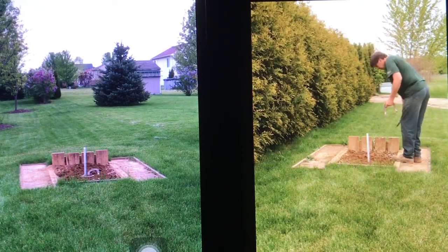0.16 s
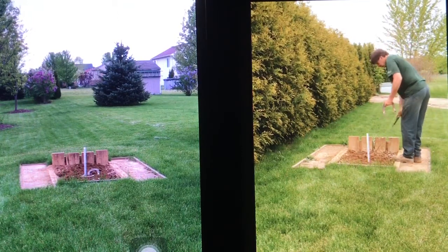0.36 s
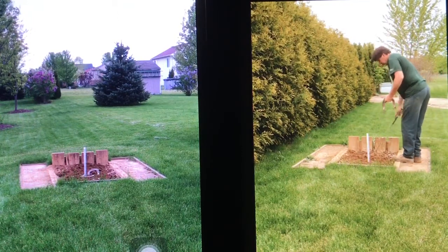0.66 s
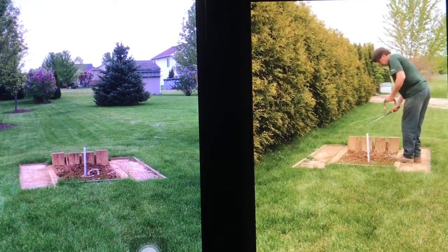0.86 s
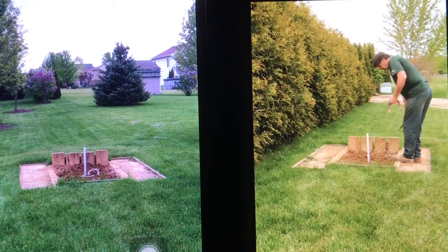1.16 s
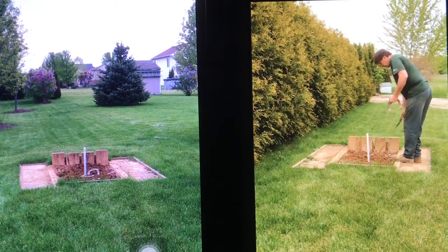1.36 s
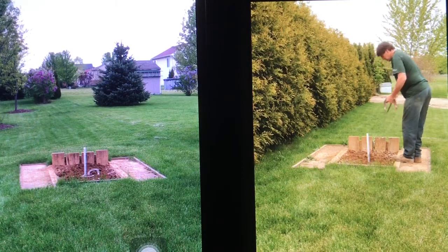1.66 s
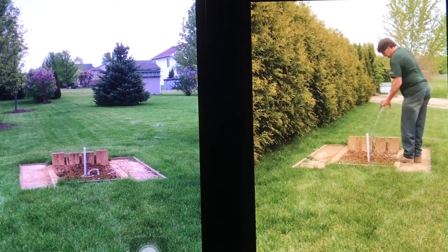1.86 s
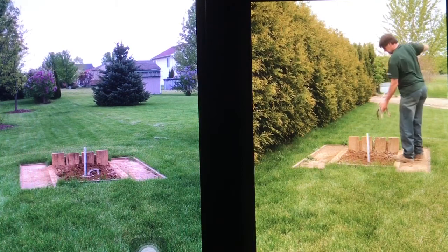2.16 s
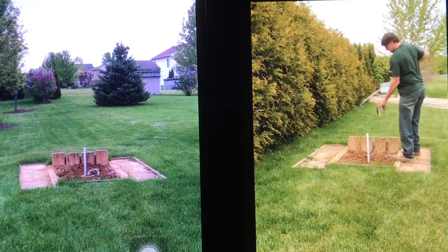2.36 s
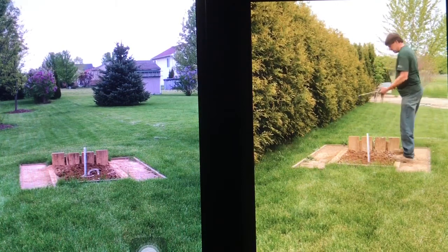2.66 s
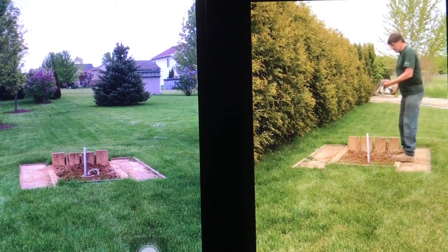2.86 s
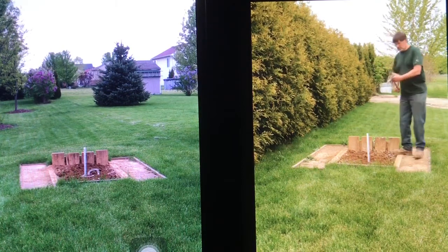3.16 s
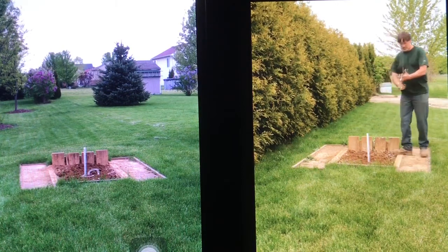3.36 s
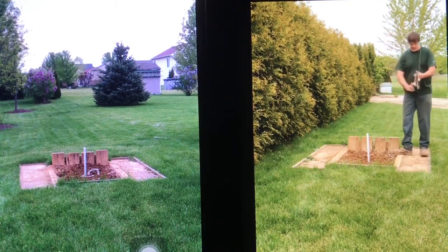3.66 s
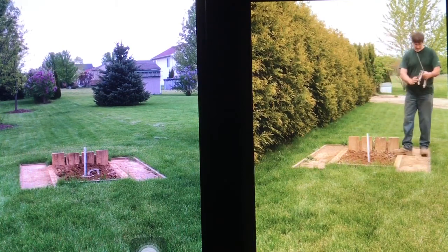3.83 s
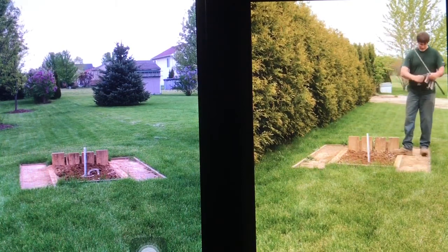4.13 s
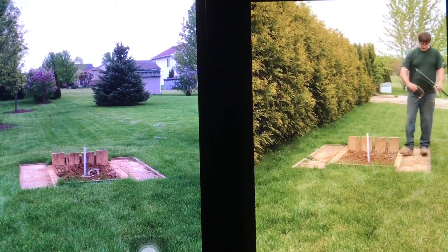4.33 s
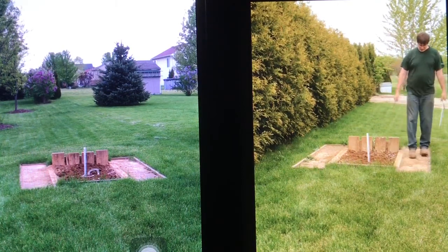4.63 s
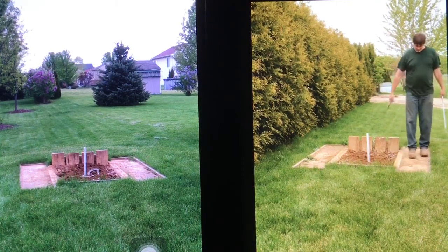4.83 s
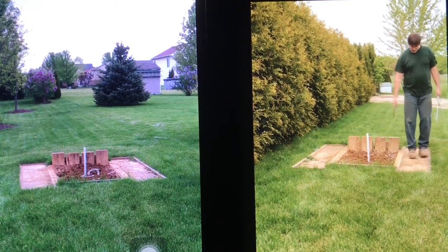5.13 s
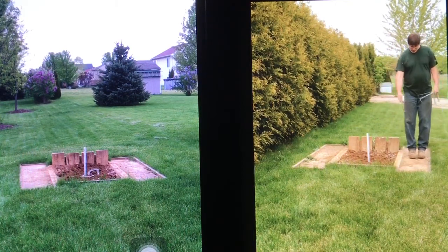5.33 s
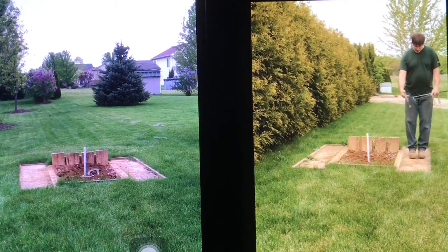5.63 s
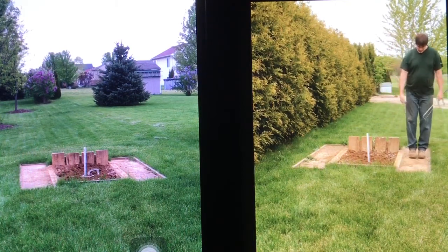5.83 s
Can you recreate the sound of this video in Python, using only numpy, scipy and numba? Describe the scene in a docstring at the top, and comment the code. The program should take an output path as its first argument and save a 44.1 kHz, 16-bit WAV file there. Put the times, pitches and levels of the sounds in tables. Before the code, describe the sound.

A back yard heard by one microphone at some distance. At 0.05 seconds a very loud, hard steel clank cracks out, choked with almost no ring, and slaps back from nearby walls with a diffuse hedge tail. Soft scuffing leads to a second, brighter, rattling double clank near 1.2 seconds. From 1.7 seconds horseshoes clink in the hands: a few short muted ticks, then the loudest clear ring at 2.2, shimmering for about half a second with a noisy wash. More mid-high clinks cluster at 2.55-2.65, faint ones follow at 3.25, and a bright short pair with dull ticks comes around 3.6. A last faint ring sounds at 4.1. Low boot thumps appear throughout, strongest at 4.5, with weak ones after 5.2. A small bird repeats a falling three-note chirp roughly every 0.7 seconds from 1.15 onward, over faint air, leaves and distant hum.

```python
"""Horseshoes in a back yard.

Two hard, choked clanks (resonant noise bursts), then freely ringing clinks and some wall echoes of them
(ticks plus decaying modes). Nearby walls return a cluster of echoes and hedges a diffuse tail.
A bird repeats one chirp of gliding sines; filtered noise makes footfalls, scuffs and a wash of reflections.
Shaped noise makes outdoor air and leaves; wavering sines make the hum of a far machine."""
import sys
import numpy as np
from scipy import signal
from scipy.fft import rfft, irfft
from scipy.io import wavfile
from scipy.ndimage import uniform_filter1d
from numba import njit

SR = 44100
rng = np.random.default_rng(int(sys.argv[2]) if len(sys.argv) > 2 else 0)


def store_wav(level_fs):
    """Save 16-bit WAV to argv[1]."""
    pcm = np.round(np.clip(np.atleast_2d(level_fs), -1, 1) * 32767)
    wavfile.write(sys.argv[1], SR, pcm.T.astype(np.int16))


N = 264159
T = np.arange(N) / SR

# choked clanks: (time [s], relative blow level [dB], centre [Hz], width [Hz],
#   brightness [dB], ring level [dB], yard level [dB])
CLANK_BLOWS = [(0.0551, -3.5, 2590, 1440, -10.5, -37.5, 2.5), (1.177, -34, 2700, 2500, 4, -53, 1),
               (1.1865, -8, 3530, 1510, -8, -43, -3.5), (1.2063, -13.5, 5470, 2500, -5.5, -49, -16)]
# spectrum of steel-on-steel contact: (frequency [Hz], gain [dB])
CONTACT_SPECTRUM = [(200, -28.5), (900, -18.5), (1600, -6), (2500, 3.5), (4000, 2.5), (5500, -6),
                    (7500, -7.5), (9500, -17), (13000, -32), (16000, -34)]
# ringing clinks, and some wall echoes of them, played as further clinks:
#   (time [s], ring level [dB], favoured frequency [Hz],
#   tilt [dB/octave], ring length [share of t60], relative contact level [dB])
CLINK_EVENTS = [(1.7160, -32.5, 2180, 4.5, .4, -10), (1.7650, -38.5, 3400, -5, 0.13, -12),
                (1.8179, -46, 3400, -19, 0.19, -21.5), (2.1480, -57, 9300, 4.5, 2, -35),
                (2.1862, -20.5, 3450, -8, 0.89, 2.5), (2.1880, -21.5, 4700, 1, 1.14, -17),
                (2.2225, -24.5, 2120, 6.5, 0.75, -14), (2.3450, -30.5, 3620, 0, 0.75, -36),
                (2.5622, -29, 3440, 2, 0.25, -29.5), (2.6110, -31.5, 3420, 1.5, 0.64, -17),
                (2.6290, -33.5, 1300, -3, 0.47, -5), (2.6570, -40, 2500, -5.5, 1.52, -34),
                (3.2420, -46, 1760, -8, 0.38, -34), (3.2770, -52.5, 1540, -10.5, 0.97, -22),
                (3.5625, -36.5, 1450, -6, 0.26, -11.5), (3.6125, -37.5, 1430, -8.5, 0.17, -16.5),
                (3.6477, -18.5, 5600, -3.5, 0.2, -16.5), (3.6600, -30.5, 2450, 7.5, 0.52, -3),
                (4.1360, -48.5, 1950, -7.5, 1.65, -30)]
# modes of the two shoes: (frequency [Hz], relative level [dB], t60 at ring length 1 [s])
SHOE_MODES = [(1254, -19.5, .9), (1406, -23, .7), (1902, -20, .55), (2169, 0, .55), (2266, -13, .45),
              (2300, -3, .75), (3235, -22, .45), (3290, -19, .45), (3441, -15, .45), (3459, 0, .55),
              (4825, -12, .35), (4852, -3, .42), (5017, -17, .45), (5798, -30, .3), (6733, -14, .4),
              (6757, -14, .45), (6952, -17, .4), (7041, -19, .35), (8785, -29, .35), (9052, -22, .35),
              (9625, -32, .3), (11300, -28, .3), (11700, -22, .28), (14030, -34, .28)]
# echoes from fence and far houses: (delay [s], relative level [dB])
YARD_ECHOES = [(.0286, 5.5), (.0375, 0), (.0775, 3.5), (.0868, -1), (.1050, -31), (.1235, -8.5),
               (.2410, -14.5), (.2900, -13.5), (.775, -18.5)]
# colour of the reflections: (frequency [Hz], gain [dB])
YARD_SPECTRUM = [(200, -13), (1600, -12), (2700, -1), (4000, -2), (5500, -7), (8000, -15.5), (12000, -16.5),
                 (16000, -12)]
# scuffs, and the noisy wash of reflections after the loud clink:
#   (middle [s], half length [s], level [dB rms at the middle], centre [Hz], width [Hz])
SCUFFS_AND_WASH = [(1.101, 0.15, -44.5, 3740, 500), (1.113, 0.18, -50, 1330, 450),
                   (1.28, .035, -27.5, 2820, 347), (2.33, 0.11, -31.5, 2870, 800),
                   (2.65, 0.025, -47, 12200, 4870), (3.311, 0.094, -42.5, 2320, 1390)]
# footfalls: (time [s], level [dB peak])
FOOTFALLS = [(.126, -37.5), (1.953, -37), (2.569, -42), (2.637, -41.5), (2.754, -36.5), (2.8, -44),
             (3.131, -44.5), (4.492, -29), (4.502, -32.5), (4.593, -42.5), (5.222, -44), (5.34, -43)]
# chirps: (time [s], relative level [dB])
CHIRP_TIMES = [(1.151, -39), (1.944, -38.5), (2.747, -42), (3.463, -39), (4.126, -39.5), (4.824, -38.5),
               (5.537, -36.5)]
# arched notes of a chirp: (delay [s], length [s], first [Hz], middle [Hz], last [Hz], relative level [dB])
CHIRP_NOTES = [(.004, 0.049, 3950, 4686, 2764, -5), (0.075, 0.043, 3060, 3758, 2895, -1.5),
               (0.131, .03, 2850, 2950, 2750, -4.5)]
# distant machine: (frequency [Hz], mean level [dB rms])
HUM_TONES = [(120, -67.5), (589, -57), (1191, -63)]
# spectrum of outdoor air: (frequency [Hz], relative density [dB])
AIR_SPECTRUM = [(20, -40), (58, -9.5), (95, -17), (160, -27.5), (250, -16), (430, -18.5), (680, -9.5),
                (950, -12.5), (1900, -13.5), (2900, -7), (3900, -11.5), (5400, -23.5), (8700, -36.5),
                (15500, -37)]
# ripple of the microphone's housing: (frequency [Hz], gain [dB])
MIC_RIPPLE = [(4200, 0.5), (4700, 1), (5350, -5.5), (5850, 4), (6300, -4.5), (6900, 6), (7300, -3.5),
              (7800, 2), (8500, -2.5), (10000, 0)]

SIZZLE_GAIN_DB, SIZZLE_DECAY_S, SIZZLE_HZ = 6, 0.025, 10100  # gain relative to the blow level
TICK_HZ, TICK_WIDTH_HZ, TICK_DECAY_S = 2420, 940, 0.0051
FAVOUR_DB, FAVOUR_OCTAVES = 14.5, 0.3  # lift of modes near the favoured frequency, and its reach
GRIP_CENTS = 2.32  # sharpening by a grip that halves the ring
WANDER_DB, WANDER_CENTS = 3, 4.5  # spread of each mode's level and pitch
SMEAR_S, SMEAR_DOUBLES_S = 0.0016, 0.45  # echo smear, and the delay that doubles it
WALL_DELAY_S, WALL_BOUNCE_DB = 0.049, -9
TAIL_BUILD_S, TAIL_T60_S = 0.038, 0.61
TREES_DB, TREES_HOLD_S, TREES_T60_S = -39, 0.82, 0.31  # level relative to the hedge
STEP_HZ, STEP_DECAY_S = 297, 0.012
AIR_DB, LEAVES_DB = -46, -56.5  # mean rms
LEAVES_HZ, LEAVES_WIDTH_HZ = 3300, 700
THRESHOLD_DB, RELEASE_S = -12.5, 0.14
TOP_HZ = 15700


def undb(db):
    """Decibels to gain."""
    return 10 ** (np.asarray(db) / 20)


def unit(x):
    """Scale to an rms of one."""
    return x / np.sqrt(np.mean(x ** 2))


def add(out, start_s, x):
    """Mix x into out from start_s."""
    i = max(int(start_s * SR), 0)
    out[i:i + len(x)] += x[:N - i]


def colour(x, points):
    """Minimum-phase filter with the given (Hz, dB) outline."""
    size = 4096
    hz, db = np.transpose(points)
    log_hz = np.log(np.fft.rfftfreq(size, 1 / SR) + 1)
    gain = undb(np.interp(log_hz, np.log(hz), db))
    # folding the cepstrum makes the response causal
    cepstrum = irfft(np.log(gain))
    cepstrum[1:size // 2] *= 2
    cepstrum[size // 2 + 1:] = 0
    response = irfft(np.exp(rfft(cepstrum)))
    return signal.fftconvolve(x, response)[:len(x)]


def resonate(x, hz, width_hz):
    """One resonance, gain one at its centre."""
    return signal.lfilter(*signal.iirpeak(hz, hz / width_hz, fs=SR), x)


def resonate_twice(x, hz, width_hz):
    """Two resonances in series at one centre, the second twice as wide."""
    return resonate(resonate(x, hz, width_hz), hz, 2 * width_hz)


def lowpass(x, order, hz):
    """Butterworth low-pass."""
    return signal.sosfilt(signal.butter(order, hz, fs=SR, output="sos"), x)


def burst(decay_s):
    """Unit-energy puff of noise: faded, spectrally flattened, then faded again by the root of the fade."""
    t = T[:SR // 10]
    fade = np.exp(-t / decay_s) * (1 - np.exp(-t / 0.00054))
    spectrum = rfft(rng.standard_normal(len(t)) * fade)
    x = irfft(spectrum / abs(spectrum)) * np.sqrt(fade)
    return x / np.linalg.norm(x)


def walk(rate_hz):
    """Random drift: about unit-spread knots at rate_hz, joined by lines."""
    knots = rng.standard_normal(int(rate_hz * N / SR) + 2)
    return np.interp(T * rate_hz, np.arange(len(knots)), knots)


def clanks():
    """Hard blows on gripped steel: a crack with a broad resonance and almost no ring."""
    out = np.zeros(N)
    for start_s, db, hz, width_hz, bright_db, ring_db, yard_db in CLANK_BLOWS:
        blow = np.zeros(N)
        crack = colour(burst(0.0019), CONTACT_SPECTRUM)
        buzz = colour(burst(0.0068), CONTACT_SPECTRUM)  # faces chatter briefly before they part
        body = resonate_twice(crack + undb(-9.5) * buzz, hz, width_hz)
        bright = undb(bright_db) * (crack + undb(7) * buzz)
        add(blow, start_s, undb(db + 16.5) * (body + bright))
        add(blow, start_s, ring(ring_db + strike(favoured_hz=9560, tilt_db=5), length=0.1))
        # fine bright chatter, heard without reflections
        sizzle = resonate(resonate(burst(SIZZLE_DECAY_S), SIZZLE_HZ, 7100), SIZZLE_HZ, 9000)
        add(out, start_s, undb(db + SIZZLE_GAIN_DB) * sizzle)
        out += blow + undb(yard_db) * yard(blow, wall_db=8.5, echo_db=1.5, tail_db=-18.0)
    return out


def clinks():
    """Ringing clinks, and some wall echoes of them, played as further clinks: a tick plus the ring."""
    ticks, rings = np.zeros(N), np.zeros(N)
    for start_s, ring_db, favoured_hz, tilt_db, length, contact_db in CLINK_EVENTS:
        contact = colour(burst(TICK_DECAY_S), CONTACT_SPECTRUM)
        tick = resonate(contact, TICK_HZ, TICK_WIDTH_HZ) + undb(-9.5) * contact
        add(ticks, start_s, undb(contact_db + 13.5) * tick)
        add(rings, start_s, ring(ring_db + strike(favoured_hz, tilt_db), length))
    tick_echo = yard(ticks, wall_db=0, echo_db=-5.5, tail_db=-26.5)
    ring_echo = yard(rings, wall_db=-7.5, echo_db=-13, tail_db=-37)
    return ticks + rings + tick_echo + ring_echo


def strike(favoured_hz, tilt_db):
    """Mode weights in dB: a harder touch tilts them up, and its place favours one group."""
    hz = np.array(SHOE_MODES)[:, 0]
    distance = np.log2(hz / favoured_hz) / FAVOUR_OCTAVES
    return tilt_db * np.log2(hz / 3000) + FAVOUR_DB * np.exp(-distance ** 2)


def ring(weights_db, length):
    """Shoe modes: the contact point weights them, the grip damps and stiffens them."""
    t = T[:SR * 3 // 4]
    coarse_s = t[::700]
    onset = np.minimum(coarse_s / 0.04, 1)
    x = np.zeros(len(t))
    for k, (hz, db, t60_s) in enumerate(SHOE_MODES):
        # random wander of level and pitch roughens each mode, as dense reflections do
        level_wander, pitch_wander = rng.standard_normal((2, len(coarse_s))) * onset
        decay = np.exp(-np.log(1000) * coarse_s / (t60_s * length))
        fade = undb(db + weights_db[k] + WANDER_DB * level_wander) * decay
        cents = GRIP_CENTS * (1 / length - 1) + WANDER_CENTS * pitch_wander
        pitch_hz = np.interp(t, coarse_s, hz * 2 ** (cents / 1200))
        tone = np.sin(2 * np.pi * np.cumsum(pitch_hz) / SR)
        x += (-1) ** k * np.interp(t, coarse_s, fade) * tone
    # a slim bar radiates almost no bass
    return signal.sosfilt(signal.butter(4, 1100, "high", fs=SR, output="sos"), x)


def yard(x, wall_db, echo_db, tail_db):
    """Reflections only: near-wall slaps, echoes smeared by rough surfaces, a tail scattered by foliage."""
    t = T[:SR]
    patches_db = 3 * rng.standard_normal(SR // 60).repeat(60)
    response = unit(rng.standard_normal(SR) * undb(patches_db))
    hedge = (1 - np.exp(-t / TAIL_BUILD_S)) * np.exp(-np.log(1000) * t / TAIL_T60_S)
    trees_fade = np.exp(-np.log(1000) * np.maximum(t - TREES_HOLD_S, 0) / TREES_T60_S)
    response *= undb(tail_db) * np.hypot(hedge, undb(TREES_DB) * trees_fade)
    slaps = [(WALL_DELAY_S, wall_db), (2 * WALL_DELAY_S, wall_db + WALL_BOUNCE_DB)]
    echoes = [(delay_s, echo_db + db) for delay_s, db in YARD_ECHOES]
    for delay_s, db in slaps + echoes:
        air_hz = 19000 / (1 + (delay_s / 0.33) ** 2)  # longer paths lose treble
        smear_s = SMEAR_S * (1 + (delay_s / SMEAR_DOUBLES_S) ** 2)
        add(response, delay_s, undb(db) * lowpass(burst(smear_s), 3, air_hz))
    return signal.fftconvolve(x, colour(response, YARD_SPECTRUM))[:N]


def bird():
    """Arched whistle and lower after-notes: gliding sines with strong reflections."""
    out = np.zeros(N)
    for start_s, chirp_db in CHIRP_TIMES:
        for delay_s, length_s, first_hz, middle_hz, last_hz, db in CHIRP_NOTES:
            along = np.linspace(0, 1, int(length_s * SR))
            parabola = np.polyfit([0, 0.5, 1], [first_hz, middle_hz, last_hz], 2)
            detune = 1 + 0.01 * rng.standard_normal() + 0.02 * walk(376)[:len(along)]
            pitch_hz = np.polyval(parabola, along) * detune
            swell = np.sqrt(abs(np.sin(np.pi * along)))
            note = swell * np.sin(2 * np.pi * np.cumsum(pitch_hz) / SR)
            add(out, start_s + delay_s, undb(chirp_db + db) * note)
    return undb(2) * out + yard(out, wall_db=-4.5, echo_db=-16, tail_db=-22.5)


def scuffs_and_wash():
    """Scuffs, and the noisy wash of reflections after the loud clink: uneven band noise that swells and fades."""
    out = np.zeros(N)
    for middle_s, half_s, db, hz, width_hz in SCUFFS_AND_WASH:
        uneven_noise = rng.standard_normal(N) * undb(5.4 * walk(150))
        band = unit(resonate_twice(uneven_noise, hz, width_hz))
        out += band * undb(db) * np.exp(-((T - middle_s) / half_s) ** 2)
    return out


def steps():
    """Low resonant thumps of boots, each with a little crisp contact."""
    out = np.zeros(N)
    for start_s, db in FOOTFALLS:
        thump = resonate(resonate(burst(STEP_DECAY_S), STEP_HZ, 270), STEP_HZ, 420)
        crisp = resonate(resonate(burst(0.0027), 1400, 800), 1050, 1000)
        step = thump + undb(-11) * crisp
        add(out, start_s, undb(db) * step / abs(step).max())
    return out


def background():
    """Outdoor air and leaf rustle from drifting noise, plus a slightly wavering hum of sines."""
    air = unit(colour(rng.standard_normal(N), AIR_SPECTRUM)) * undb(AIR_DB + 0.5 * walk(3.3))
    rustle = resonate_twice(rng.standard_normal(N), LEAVES_HZ, LEAVES_WIDTH_HZ)
    leaves = unit(rustle) * undb(LEAVES_DB + 2 * walk(8.1))
    hum = np.zeros(N)
    for hz, db in HUM_TONES:
        level = undb(db + 0.29 * walk(5.92)) * np.sqrt(2)  # rms to peak
        pitch_hz = hz * (1 + 0.001 * walk(8))
        hum += level * np.sin(2 * np.pi * np.cumsum(pitch_hz) / SR)
    return air + leaves + hum


def scene():
    """All sources at one microphone."""
    return (clanks() + clinks() + bird() + scuffs_and_wash() + steps() + background())[None]


@njit
def follow(x, release):
    """Peak follower: jumps up at once and sinks slowly."""
    peak, out = 0., np.empty(len(x))
    for i in range(len(x)):
        peak = max(abs(x[i]), peak * release)
        out[i] = peak
    return out


def record(dry):
    """Microphone ripple, 2:1 compression above a threshold, rounded peaks, top cut."""
    x = colour(dry[0], MIC_RIPPLE)
    smooth = uniform_filter1d(abs(x), size=180) * np.pi / 2  # mean of a sine to its peak
    peak = follow(smooth, np.exp(-1 / (RELEASE_S * SR)))
    x = x * np.minimum(1, undb(THRESHOLD_DB) / (peak + 1e-9)) ** 0.5
    x = x / (1 + (x / 0.75) ** 8) ** (1 / 8)
    return signal.sosfilt(signal.ellip(8, 0.2, 70, TOP_HZ, fs=SR, output="sos"), x)[None]


dry = scene()
out = record(dry)
store_wav(out)
```